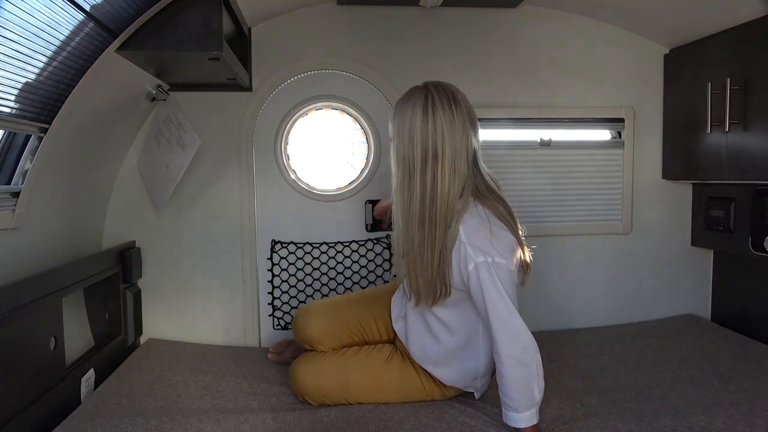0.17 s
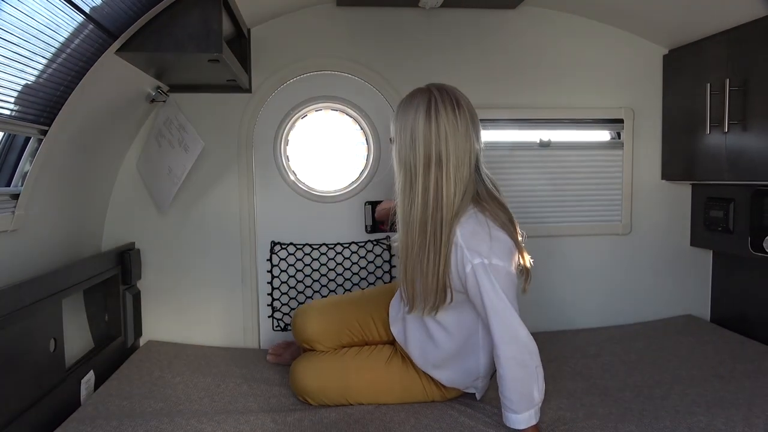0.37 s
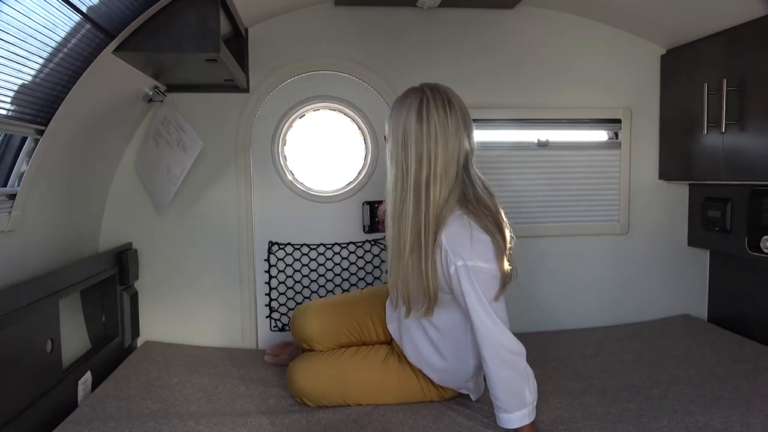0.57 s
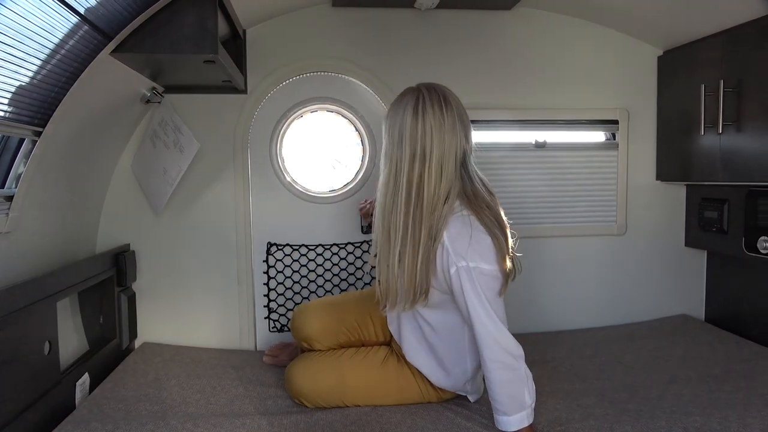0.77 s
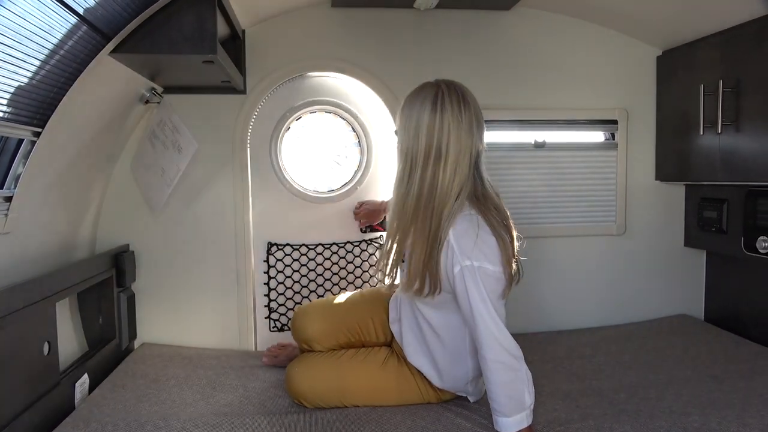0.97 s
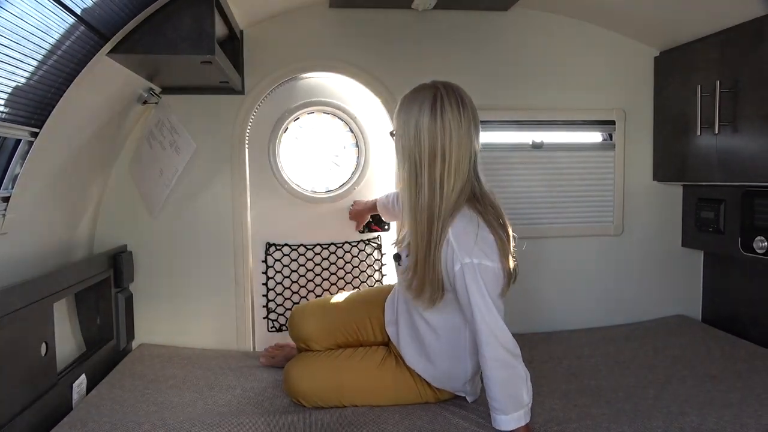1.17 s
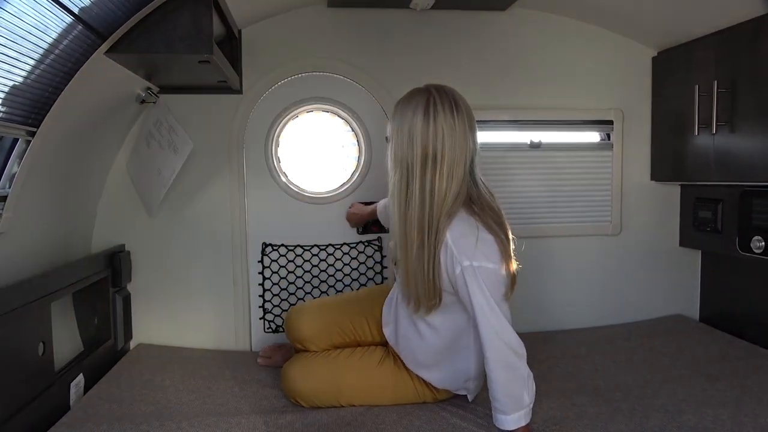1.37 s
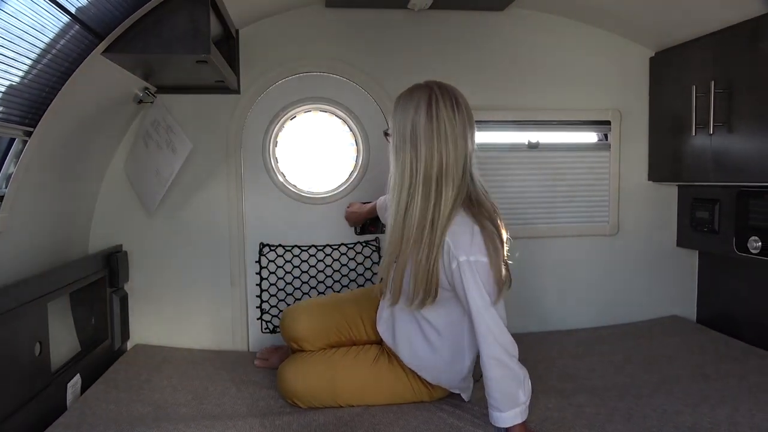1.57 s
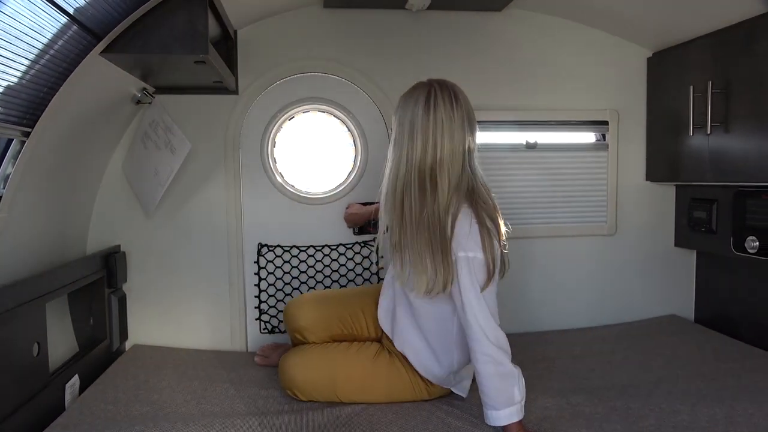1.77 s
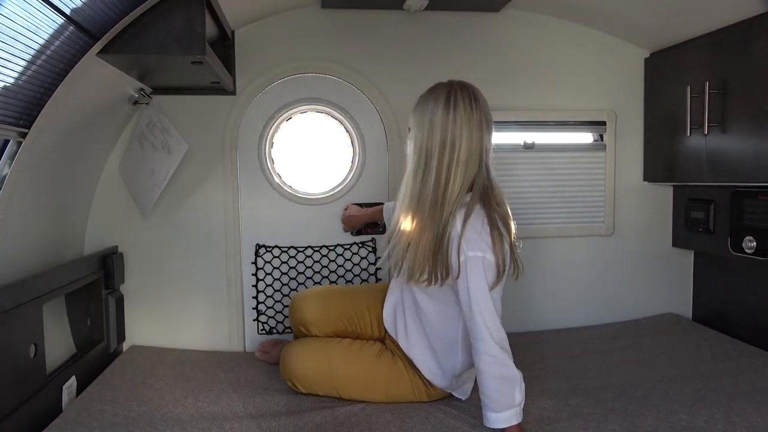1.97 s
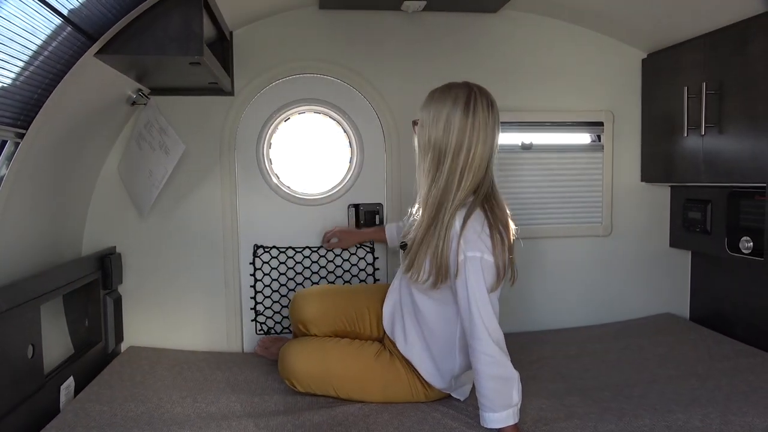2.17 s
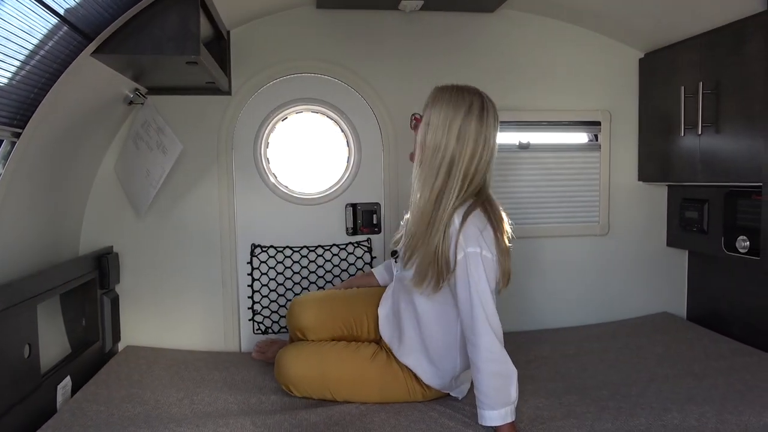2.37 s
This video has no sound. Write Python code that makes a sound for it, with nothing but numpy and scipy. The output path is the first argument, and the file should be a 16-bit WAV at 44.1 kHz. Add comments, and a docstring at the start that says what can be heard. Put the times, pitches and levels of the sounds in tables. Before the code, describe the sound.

Trailer door latch, inside a small dry cabin, mono. Firm clicks and panel thumps at 0.2 and 0.4 s, then a loud clack at 0.7-0.8 s with a ringing metal bolt snap. Light handle knocks at 1.0-1.15. At 1.4-1.5 the door slams in a tight cluster with a deep pressure thump; a faint whine stops. Quiet, then soft net brushing from 2.1 and small clicks near 2.35.

```python
"""Trailer door latch and slam

From inside a small, dry, padded cabin, a hand works a door's latch and handle, then pulls the door shut.
Clicks are fading noise bands with a sine ping; the snapping bolt, loose handle and panel are struck modes.
Low sines are the cabin air heaving; filtered noise makes still air, boom and rumble under a thin whine
that drops away as the door seals. At the end the hand brushes the net pocket: grainy, filtered noise.
"""
import sys
import numpy as np
from scipy import signal
from scipy.fft import rfft, irfft
from scipy.io import wavfile
from scipy.ndimage import uniform_filter1d

SR = 44100
rng = np.random.default_rng(int(sys.argv[2]) if len(sys.argv) > 2 else 0)


def pcm_store(signal):
    """Save signal as 16-bit PCM."""
    levels = np.round(np.clip(np.atleast_2d(signal), -1, 1) * 32767)
    wavfile.write(sys.argv[1], SR, levels.astype(np.int16).T)


N = 107118  # length in samples

# Spectrum of the still air, relative: pitch_hz, level_db (per Hz)
AIR_SPECTRUM = [(59, -41.5), (100, -20), (140, -6.5), (224, -2), (315, -14.5), (524, -5.5), (608, -24),
                (752, -11.5), (801, -13.5), (1310, -18.5), (2470, -31), (3940, -36), (16000, -45.5)]
# Level of the still air over time: time_s, level_db
AIR_LEVEL = [(0, -54), (.6, -55), (1.05, -54), (1.35, -53.5), (1.75, -55.5), (2.43, -52)]
# Level of the low boom over time: time_s, level_db
BOOM_LEVEL = [(0, -43.5), (.15, -60), (.3, -39.5), (.65, -52.5), (.82, -35.5), (.95, -48), (1.05, -39),
              (1.17, -50), (1.27, -39), (1.4, -54), (1.7, -61), (2.43, -52.5)]
BOOM_HZ, BOOM_WIDTH_HZ = 89.2, 9.9
# Level of the deep rumble over time: time_s, level_db
RUMBLE_LEVEL = [(0, -62), (.4, -35), (.7, -56), (1.2, -56), (1.4, -42.5), (1.6, -35), (1.9, -42),
                (2.43, -59)]
# Level of the thin whine over time: time_s, level_db
WHINE_LEVEL = [(0, -55.5), (.16, -63), (.6, -65), (1.0, -67), (1.38, -70), (1.42, -90)]
WHINE_HZ = 2112

# Latch and handle clicks: start_s, level_db, colour_hz, then treble_db, top_db and low_mid_db
# relative to the colour band, t60_s of the colour and low-mid bands
CLICKS = [(0.0468, -35, 1030, -35, -40, 4, 0.049), (0.175, -15.5, 1538, -5.5, -18.5, 0.5, 0.12),
          (0.1802, -18, 1350, -2.5, -14, 2.5, 0.077), (0.255, -27.5, 1255, -24, -38, -2, 0.1),
          (0.3627, -18.5, 1508, -15, -23.5, -1.5, 0.084), (0.3838, -37, 1060, 2, -34, 14.5, 0.26),
          (0.399, -16.5, 1540, -12, -20.5, 0, 0.11), (0.4139, -12, 1005, -8, -23, -9, 0.089),
          (0.4673, -12, 1956, -12.5, -35, -1.5, 0.087), (0.4734, -13, 1300, -19, -45, -17, 0.062),
          (0.6751, -32, 1300, -14.5, -18, -13, 0.078), (0.7086, -13.5, 1360, -16.5, -23, 0, 0.15),
          (0.7169, -12.5, 1780, -13, -24, -9, 0.028), (0.7767, -7, 900, 0.5, -41, -2, 0.1),
          (0.779, -1.5, 1472, -16, -43, -22, 0.074), (0.9523, -41.5, 2130, -26, -29, 7.5, 0.044),
          (0.9818, -35.5, 1340, -6.5, -34, 2.5, 0.19), (0.9937, -23, 1500, -12, -45, -10, 0.07),
          (1.1092, -36, 1313, -14, -33, -0.5, 0.097), (1.3439, -28, 1400, -43, -42, -32, 0.069),
          (1.3884, -58, 2600, 9.5, -7.5, -10, 0.03), (1.4141, -2, 1950, -9.5, -21.5, -0.5, 0.082),
          (1.4171, -5, 1400, -3, -11.5, 3.5, 0.048), (1.4412, -6.5, 1450, -7.5, -19, -2.5, 0.083),
          (1.4604, -15.5, 1440, -4, -6.5, 6, 0.11), (1.5273, -23.5, 1380, -19, -37, 1, 0.093),
          (1.6545, -42, 1100, -6.5, -18, 8, 0.075), (1.945, -45, 1040, -3, -38, 0, 0.16),
          (2.096, -48, 1870, 10.5, -20, -20, 0.072), (2.3271, -31, 1246, -7, -12.5, 4, 0.19),
          (2.367, -21, 1180, -3.5, -21, 3.5, 0.051), (2.3793, -23.5, 1360, 4, -7, -16, 0.057),
          (.186, -22, 1236, -5, -21, 15, 0.052), (.421, -13.5, 1520, -20, -32, -31, 0.088),
          (1.0775, -55, 2490, 7, -9, -19, 0.0093), (1.0988, -51, 2540, 9, -19, -12, 0.035),
          (1.149, -28.5, 1356, -13, -30, -13, 0.073), (1.156, -30, 1820, -11.5, -26, -7, 0.071),
          (1.430, -5.5, 1484, -18, -26, -0.5, 0.12), (2.335, -30, 1200, -3, -12, 6.5, 0.027)]
# Resonances of the latch case and door skin, which colour the clicks: pitch_hz, level_db
CASE_MODES = [(375, 3), (624, -2.5), (885, 0), (1110, -2), (1320, -1), (1540, 1.5), (1960, 3), (2230, -1.5),
              (2510, -0.5)]
CASE_WIDTH_HZ, CASE_VALLEY_DB = 50, -7
LOW_MID_HZ, LOW_MID_WIDTH_HZ = 380, 400
TREBLE_HZ, TREBLE_WIDTH_HZ, TREBLE_SPEED = 3307, 2510, 1.173  # speeds multiply the click's fade in dB
TOP_HZ, TOP_WIDTH_HZ, TOP_SPEED = 8870, 3500, 1.4
PING_DB, PING_SPEED = -1, 1.7  # the struck part rings briefly at the click's colour
RISE_S, CRACK_DB, CRACK_S = 0.00032, -2.5, 0.0015  # ramp of a firm click, and its extra initial crack
SOFT_BELOW_DB, SOFT_S_PER_DB = -26, .0001  # lighter touches than this build up more slowly
CLICK_TRIM_DB = -12

# Blows into the door panel: start_s, level_db, contact_ms
THUMPS = [(.187, -19, 2.56), (.190, -6, 6.4), (.255, -27, 4.9), (.386, -19.5, 1.9), (.405, -4, 10.64),
          (.47, -26, 1.9), (.712, -21, 1.07), (.778, -24, 0.81), (.995, -21.5, 6.7), (1.155, -31.5, 6.1),
          (1.225, -25, 6.2), (1.35, -24.5, 9.4), (1.416, -6, 1.22), (1.44, -13, 1.26), (1.53, -23.5, 3.2),
          (1.95, -40.5, 2.23), (2.367, -37.5, 2.1)]
# Modes of the door panel: pitch_hz, level_db, t60_s
PANEL_MODES = [(118.5, 3.5, 0.1), (149.3, 1, 0.11), (215.6, -2.5, 0.11), (286, -3, 0.1), (362, 8, 0.06),
               (430, -2, .11), (623, -20, 0.24), (882, 1, 0.08)]
# Loose handle knocking: start_s, level_db
KNOCKS = [(.983, -35), (.994, -29), (1.152, -43), (1.47, -30), (1.569, -46.5)]
# Modes of the handle: pitch_hz, level_db, t60_s
HANDLE_MODES = [(1090, -1, 0.038), (1322, 5, .08), (1390, -8.5, 0.09)]
BLOW_SPREAD_DB = 1.5  # random spread of each mode from blow to blow

# Cabin air heaving as the door moves: start_s, level_db, pitch_hz, t60_s
HEAVES = [(0.212, -22, 33.5, 0.33), (0.428, -9.5, 37.7, 0.13), (0.469, -24.5, 16.6, 0.8),
          (0.73, -27, 36, 0.54), (1.431, -8, 39.5, 0.2), (1.478, -4, 16.9, 0.34), (1.486, 2, 43.7, 0.05),
          (1.503, -10.5, 81, 0.061), (1.618, -31, 30, 0.27)]

# Spring bolt snapping: start_s, level_db, then low_db, middle_db and top_db set by where it lands,
# length (a factor on the t60 of every mode)
SNAPS = [(0.7768, -15.5, -11, -4, -4, .7), (.7965, -30, -10, 0, 3, .8), (1.461, -38.5, -4, 7, 10.5, 1.4),
         (1.5258, -41.5, 7.5, -9, -11, 1.76)]
# Modes of the bolt before the landing spot and length act: pitch_hz, level_db, t60_s
BOLT_MODES = [(2375, -6, .1), (4430, -6, .155), (4930, -8, .05), (5350, -3, .12), (5535, 0, .11),
              (5700, -6, .05), (7610, -10, .045), (10070, -14, .06), (10950, -11, .065), (11200, -19, .05),
              (15230, -27, .09)]
FLUTTER_DEPTH, FLUTTER_T60_S = 1.1, .3  # close echoes make each mode flutter at first
CAUGHT_S, CAUGHT_DB_PER_S = 1.585, 500  # from here the seated bolt is held and dies faster

# Level of the hand along the net pocket: time_s, level_db
BRUSH_LEVEL = [(2.085, -96.5), (2.096, -55.5), (2.2, -56), (2.3, -57.5), (2.39, -50.5), (2.43, -59)]
# Spectrum of skin on the net, relative: pitch_hz, level_db (per Hz)
NET_SPECTRUM = [(590, -10.5), (1000, 1.5), (1190, -10), (1340, -5), (2150, -9.5), (4360, -10.5),
                (16000, -33)]

CEILING, EDGE_HZ = .95, 16150  # peak limit before filtering, and the microphone's upper band edge


def amp(db):
    """Decibels to linear gain."""
    return 10 ** (np.asarray(db) / 20)


def evened(x):
    """Scale a sound to rms 1."""
    return x / np.sqrt(np.mean(x ** 2) + 1e-20)


def curve(points):
    """Gain over the whole scene, drawn in straight dB lines between the points."""
    time_s, level_db = np.transpose(points)
    return amp(np.interp(np.arange(N) / SR, time_s, level_db))


def add(mix, start_s, sound):
    """Lay a sound into the mix, cut off at the end of the scene."""
    part = mix[round(start_s * SR):][:len(sound)]
    part += sound[:len(part)]


def coloured(size, points):
    """Noise of rms 1 with the given spectrum."""
    hz = np.fft.rfftfreq(size, 1 / SR)
    pitch_hz, level_db = np.transpose(points)
    gain = amp(np.interp(np.log(hz + 1), np.log(pitch_hz), level_db, left=-90))
    return evened(irfft(rfft(rng.standard_normal(size)) * gain, size))


def band(size, hz, width_hz):
    """Noise of rms 1 in one steep resonance."""
    f = np.fft.rfftfreq(size, 1 / SR)
    gain = f / hz / (1 + ((f - hz) / width_hz) ** 2) ** 2
    return evened(irfft(rfft(rng.standard_normal(size)) * gain, size))


def background():
    """Still air, low boom and rumble are filtered noise; the whine is a sine with a wavering level."""
    waver = amp(1.3 * band(N, 8.07, 8))  # 1.3 dB rms, around eight times a second
    sine = np.sqrt(2) * np.sin(2 * np.pi * WHINE_HZ * np.arange(N) / SR)
    whine = sine * curve(WHINE_LEVEL) * waver
    boom = band(N, BOOM_HZ, BOOM_WIDTH_HZ) * curve(BOOM_LEVEL)
    rumble = band(N, 20, 29) * curve(RUMBLE_LEVEL)
    air = coloured(N, AIR_SPECTRUM) * curve(AIR_LEVEL)
    return air + boom + rumble + whine


def clicks():
    """A sharp crack and ping, then dense echoes in the cabin as four fading bands of noise."""
    out, size = np.zeros(N), 4096
    t = np.arange(size) / SR
    f = np.fft.rfftfreq(size, 1 / SR)
    case_hz, case_db = np.transpose(CASE_MODES)[:, :, None]
    case_peaks = amp(case_db) / (1 + ((f - case_hz) / CASE_WIDTH_HZ) ** 2)
    case = amp(CASE_VALLEY_DB) + case_peaks.sum(0)

    def cased(noise):
        """Pass noise through the latch case and door skin, back to rms 1."""
        return evened(irfft(rfft(noise) * case, size))

    def faded(noise, db):
        """Fade noise along a dB line, with the energy of that line whatever the random draw."""
        shaped = noise * amp(db)
        return shaped * np.linalg.norm(amp(db)) / np.linalg.norm(shaped)

    for start_s, level_db, colour_hz, treble_db, top_db, low_mid_db, t60_s in CLICKS:
        rise_s = RISE_S + SOFT_S_PER_DB * max(SOFT_BELOW_DB - level_db, 0)
        crack = 1 + amp(CRACK_DB) * np.exp(-t / CRACK_S)
        attack = np.minimum(t / rise_s, 1) * crack
        fade_db = -60 * t / max(t60_s, .01)

        colour = faded(cased(band(size, colour_hz, colour_hz / 2)), fade_db)
        low_mid = faded(cased(band(size, LOW_MID_HZ, LOW_MID_WIDTH_HZ)), low_mid_db + fade_db)
        treble = faded(band(size, TREBLE_HZ, TREBLE_WIDTH_HZ), treble_db + TREBLE_SPEED * fade_db)
        top = faded(band(size, TOP_HZ, TOP_WIDTH_HZ), top_db + TOP_SPEED * fade_db)
        ping = amp(PING_DB + PING_SPEED * fade_db) * np.sin(2 * np.pi * colour_hz * t)

        sound = colour + low_mid + treble + top + ping
        add(out, start_s, amp(level_db + CLICK_TRIM_DB) * attack * sound)
    return out


def struck(blows, modes):
    """Each blow rings the modes, a little differently each time; a long contact dulls it."""
    out, t = np.zeros(N), np.arange(SR // 2) / SR
    hz, mode_db, t60_s = np.transpose(modes)[:, :, None]
    side = (-1) ** np.arange(len(hz))[:, None]  # neighbouring modes start in opposite directions
    for start_s, level_db, *contact_ms in blows:
        vary_db = BLOW_SPREAD_DB * rng.standard_normal(hz.shape)
        dull = 1 / (1 + (hz * sum(contact_ms) / 1000) ** 4)  # no contact time listed: no dulling
        rise = 1 - np.exp(-t * hz / 2)
        decay = amp(mode_db + vary_db - 60 * t / t60_s)
        ring = dull * rise * decay * side * np.sin(2 * np.pi * hz * t)
        add(out, start_s, amp(level_db) * ring.sum(0))
    return out


def panel_thumps():
    """Blows into the door panel ring its low modes."""
    return struck(THUMPS, PANEL_MODES)


def heaves():
    """Slow pressure swings of the closed air, each a decaying low sine."""
    out, t = np.zeros(N), np.arange(SR) / SR
    for start_s, level_db, hz, t60_s in HEAVES:
        rise = 1 - np.exp(-t * hz * 2)
        decay = amp(level_db - 60 * t / t60_s)
        add(out, start_s, decay * rise * np.sin(2 * np.pi * hz * t))
    return out


def bolt_snaps():
    """The spring bolt's metal modes ring out, fluttering at first, until the seated bolt is held."""
    out, t = np.zeros(N), np.arange(SR // 3) / SR
    hz, mode_db, t60_s = np.transpose(BOLT_MODES)[:, :, None]
    for start_s, level_db, low_db, middle_db, top_db, length in SNAPS:
        spot_db = np.interp(hz, [2400, 4400, 5300, 7000, 10000], [low_db, middle_db, 0, top_db, top_db])
        slow_noise = evened(uniform_filter1d(rng.standard_normal((len(hz), len(t))), 220))
        flutter = slow_noise * amp(-60 * t / FLUTTER_T60_S)
        steady = np.sin(2 * np.pi * hz * t)
        ring = steady + FLUTTER_DEPTH * flutter * np.cos(2 * np.pi * hz * t)
        caught_db = CAUGHT_DB_PER_S * np.maximum(start_s + t - CAUGHT_S, 0)
        decay = amp(level_db + mode_db + spot_db - 60 * t / (t60_s * length) - caught_db)
        attack = np.minimum(t / 0.0033, 1)
        add(out, start_s, (decay * ring).sum(0) * attack)
    return out


def handle_knocks():
    """The loose handle knocks and rings its few short modes."""
    return struck(KNOCKS, HANDLE_MODES)


def net_brush():
    """Skin over mesh: a hiss made grainy by fast random level swings."""
    grain = amp(2.5 * evened(uniform_filter1d(rng.standard_normal(N), 120)))
    hiss = evened(coloured(N, NET_SPECTRUM) * grain)
    return hiss * curve([(2.07, -100)] + list(BRUSH_LEVEL))


def scene():
    """Sum all layers and send the same signal to both channels."""
    mono = background() + clicks() + panel_thumps() + heaves()
    mono += bolt_snaps() + handle_knocks() + net_brush()
    return np.array([mono, mono])


def record(dry):
    """A mono microphone that rounds off the highest peaks, then the band limit."""
    soft = dry / (1 + (abs(dry) / CEILING) ** 4) ** .25
    lowpass = signal.firwin(511, EDGE_HZ, window=("kaiser", 9), fs=SR)
    return signal.oaconvolve(soft, lowpass[None], "same")


dry = scene()
out = record(dry)
pcm_store(out)
```